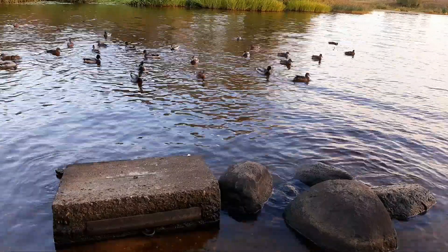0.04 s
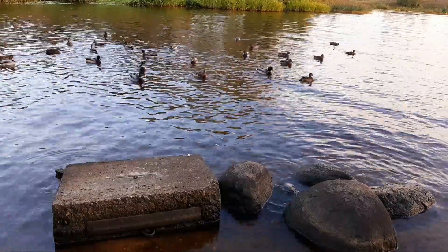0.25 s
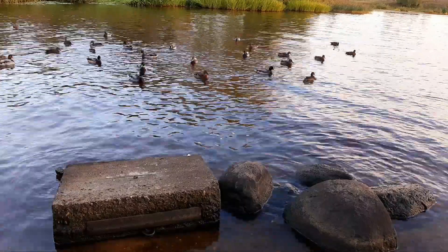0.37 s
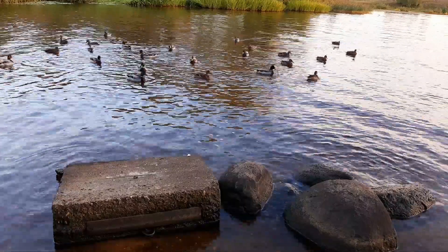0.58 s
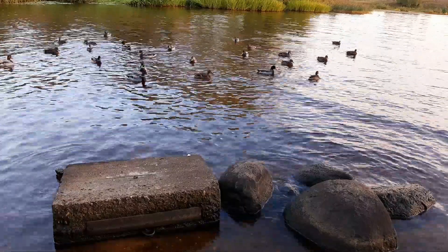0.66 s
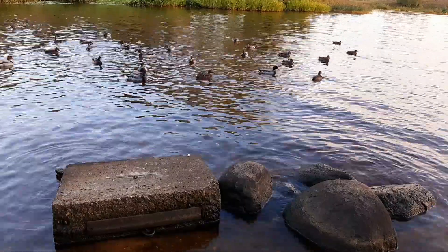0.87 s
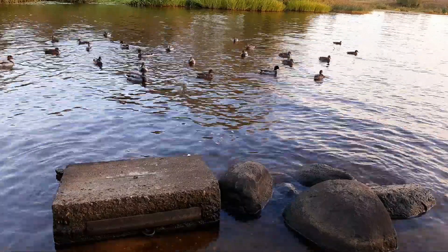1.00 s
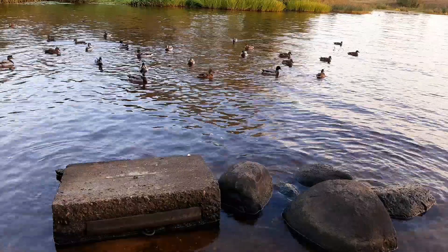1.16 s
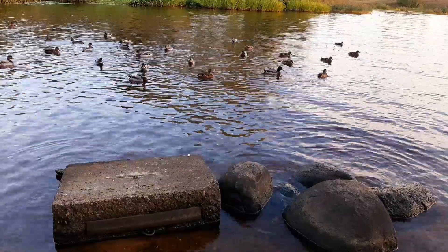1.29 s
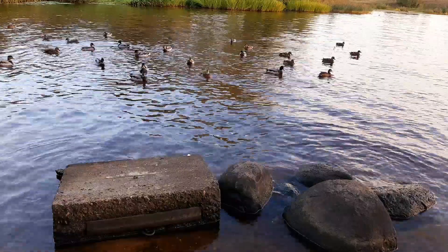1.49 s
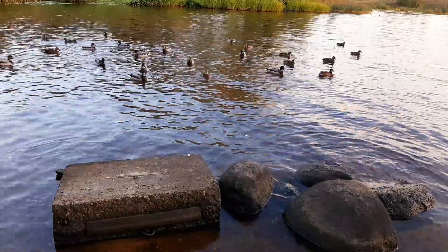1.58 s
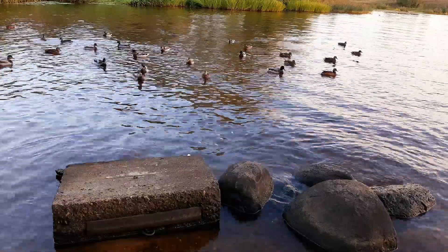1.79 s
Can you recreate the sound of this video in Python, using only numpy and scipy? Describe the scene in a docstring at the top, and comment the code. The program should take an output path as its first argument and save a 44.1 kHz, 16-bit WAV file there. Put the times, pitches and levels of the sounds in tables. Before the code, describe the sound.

Small ripples wash and lap at lakeshore stones while distant ducks quack and gulls yelp faintly

```python
"""A stony lake shore in a light breeze, with wind on the two ports of a microphone.
The wind is shaped noise at each port, pitched eddies and the hiss of one gust.
Close by, ripples wash and lap as noise and clouds of bubbles; droplets tick and trapped air plops.
Far out, gulls yelp in gliding harmonics and ducks quack as pulses through throat resonances;
the opposite bank answers both with a diffuse echo."""
import sys
import numpy as np
from scipy import signal
from scipy.fft import rfft, irfft, next_fast_len
from scipy.io import wavfile
from scipy.ndimage import uniform_filter1d, map_coordinates

SR = 44100
rng = np.random.default_rng(int(sys.argv[2]) if len(sys.argv) > 2 else 0)


def unload_audio(sound):
    """Save the sound as a 16-bit wav file, at the path given as the first command line argument."""
    columns = np.transpose(np.atleast_2d(sound))
    # keep every value between -1 and 1, then stretch to whole-number steps
    steps = np.round(np.clip(columns, -1, 1) * 32767)
    wavfile.write(sys.argv[1], SR, steps.astype(np.int16))


N = 81585
T = np.arange(N) / SR  # time in s

# Wind rumble at each port: t/s, level/dB
RUMBLE_LEVEL_LEFT = [(0, -46), (.12, -37.5), (.2, -46.5), (.55, -45), (.7, -39), (.9, -30), (1.05, -41),
                     (1.45, -44.5), (1.7, -45.5), (1.85, -45.5)]
RUMBLE_LEVEL_RIGHT = [(0, -46), (.1, -38.5), (.19, -39), (.24, -31.5), (.3, -32), (.45, -38.5), (.51, -29),
                      (.58, -27.5), (.65, -27.5), (.76, -38.5), (.85, -33.5), (1.03, -38.5), (1.1, -27),
                      (1.18, -40), (1.3, -33.5), (1.46, -31), (1.57, -41), (1.73, -48), (1.8, -42.5)]
# Spectrum of the rumble: f/Hz, density/dB
RUMBLE_SPECTRUM = [(20, -21), (40, -13), (62, 6), (100, 1.5), (150, 0), (210, -12.5), (290, -11.5),
                   (420, -30), (700, -49), (1500, -100)]
# Single eddies that strike a port: t/s (centre), level/dB, f/Hz, half length/s, roughness/0-1, port
EDDIES = [(0.015, -25.5, 85, 0.011, 0, "left"), (0.137, -26, 82.5, 0.0066, 0.07, "right"),
          (0.179, -24.5, 98, 0.01, 0.22, "right"), (0.235, -24, 123, .012, 0.63, "right"),
          (0.331, -27.5, 123, 0.0066, 0.58, "right"), (0.413, -19, 78.5, 0.0084, 0.46, "right"),
          (0.587, -17.5, 94.4, 0.014, 0.26, "right"), (0.63, -22, 115, 0.0084, 0.58, "right"),
          (0.657, -19, 112, 0.0058, 0.22, "right"), (0.847, -23.5, 109, 0.0081, 0.14, "left"),
          (.85, -29, 130, 0.01, 0.54, "right"), (0.887, -8, 101.7, 0.014, 0.06, "left"),
          (0.909, -14, 89, 0.0069, 0.2, "left"), (0.938, -23.5, 84, 0.015, 0.1, "left"),
          (1.088, -21.5, 119, 0.0075, 0.12, "right"), (1.122, -23, 97, 0.016, 0.06, "right"),
          (1.159, -26.5, 100, 0.011, 0, "left"), (1.29, -18.5, 96, 0.0077, 0.24, "right"),
          (1.36, -22, 88, 0.0046, 0, "right"), (1.409, -16.5, 151, 0.0038, 0.3, "right"),
          (1.432, -25, 127, 0.016, 0.09, "right"), (1.489, -23.5, 100, 0.011, 0, "right")]
# Spectrum of the roughness in an eddy: f/Hz, density/dB
EDDY_GRAIN_SPECTRUM = [(120, -7.5), (200, 3.5), (310, -2.5), (420, -12), (560, -28.5), (1200, -52.5)]
# Hiss of the gust at the right port: t/s, level/dB
GUST_LEVEL = [(0, -74), (.3, -58.5), (.47, -57.5), (.58, -50.5), (.62, -50.5), (.655, -45), (.71, -53.5),
              (.78, -51), (.88, -64.5), (1.03, -60.5), (1.25, -65), (1.45, -73), (1.85, -97)]
# Spectrum of the hiss: f/Hz, density/dB
HISS_SPECTRUM = [(1500, 1), (3000, -13), (4000, 7.5), (6000, -1), (9500, 1), (12500, 4.5), (16000, -1)]
EDDY_SPILL_DB = -26.5  # eddy at the other port
GUST_LEFT_DB = -6.5  # hiss at the left port, relative to the right

# Wash of the ripples: t/s, level/dB
WASH_LEVEL = [(0, -54.5), (.08, -53), (.25, -51.5), (.37, -54.5), (.55, -49), (.75, -51), (.92, -52),
              (1.04, -47), (1.17, -50.5), (1.36, -55.5), (1.54, -56), (1.62, -52), (1.76, -50),
              (1.85, -53.5)]
# Spectrum given to the wash and its fizz: f/Hz, weight/dB
WATER_SPECTRUM = [(200, 6), (400, 7), (750, -0.5), (1250, 1), (2000, 4), (2650, -0.5), (3300, -11),
                  (4200, -11), (6500, -11), (10000, -20.5), (16000, -20.5)]
BUBBLES_PER_S, BUBBLE_DECAY_CYCLES, BUBBLE_RISE = 420, 7, 0.0495  # rise: share of pitch per decay
FIZZ_DB, FLICKER_DB = -9, 1.5  # fizz against the wash; spread of the flicker

# Ripples that run up the stones: t/s, length/s, level/dB, lag of the right port/ms
LAPS = [(0.272, 0.11, -51.5, 0.22), (0.57, 0.3, -47, -0.35), (1.06, 0.44, -52, 0.44)]
# Spectrum given to the lapping froth: f/Hz, weight/dB
LAP_SPECTRUM = [(300, 13.5), (650, 3.5), (950, -0.5), (1300, 12), (2000, -2), (2700, -12), (3500, -12),
                (8000, -40)]

# Droplets that tick on stone and water: t/s, level/dB, f/Hz (ring), left over right/dB
DROPS = [(0.166, -42, 4200, 3), (.19, -44, 6700, 5), (0.2433, -41.5, 5800, 0), (0.8012, -31.5, 8000, -9),
         (0.8069, -28.5, 4300, -9), (0.9576, -37.5, 4300, 6), (1.025, -45.5, 11100, 5),
         (1.157, -39.5, 5040, 11), (1.228, -32, 5680, -3.5), (1.671, -43, 6500, 6), (1.7423, -43, 5060, 13)]
# Larger bubbles trapped by a lapping ripple: t/s, level/dB, f/Hz, decay/s, rise per decay/share
PLOPS = [(.186, -34.5, 740, 0.0051, 0.16), (.188, -28, 1300, 0.002, 0.12), (.334, -41, 1000, 0.0022, 0.086),
         (.922, -39, 682, 0.0099, 0.034), (.943, -38.5, 755, 0.0088, 0.03), (1.025, -40, 513, 0.0077, 0.06)]
DROP_RING_S, DROP_CRACK_S, DROP_CRACK = 0.00056, 0.00088, 1.37  # decays; crack gain against the ring
DROP_LOW_HZ = 4040  # high-pass of the droplets: thin, bright ticks with little below this

# Gull yelps: t/s, length/s, first f/Hz, last f/Hz, level/dB,
# brightness per harmonic up to the third/dB, lag of the right port/ms
YELPS = [(0.072, 0.036, 1135, 864, -54, -18, 0.14), (0.192, 0.058, 1355, 1180, -54.5, 0, -0.081),
         (0.383, 0.067, 1321, 955, -49.5, 3, -0.17), (0.451, 0.039, 1450, 1330, -58.5, 1.5, 0.14),
         (0.806, 0.05, 1380, 1296, -57, 6, 0.22), (0.981, 0.06, 1215, 1153, -51, -1, 0.37),
         (1.064, 0.041, 1280, 1116, -54, -3, 0.48), (1.094, 0.053, 1319, 968, -46.5, -2, -0.25),
         (1.133, 0.033, 1140, 990, -48.5, -0.5, -0.21), (1.223, 0.032, 1405, 1214, -57, -2, 0.42),
         (1.244, 0.041, 1057, 967, -52.5, -1, 0.27), (1.44, 0.048, 1138, 1052, -52.5, -3.5, 0.18),
         (1.553, 0.064, 1227, 1042, -48.5, 0.5, -0.15), (1.688, 0.094, 1122, 689, -50, -2, -0.19),
         (1.716, 0.035, 1450, 1287, -49.5, -1.5, 0.37)]
# Resonances of the gull's throat: f/Hz, level/dB
GULL_THROAT = [(800, -11), (1200, -6), (2350, 0), (3000, -14), (3800, -14), (4900, -25), (6200, -22),
               (8000, -48)]
GULL_ARCH = 1.45  # the pitch holds at first, then falls ever faster
GULL_JITTER, GULL_RASP_DB = 0.017, 3  # spread of the pitch (share) and of the level

# Duck quacks: t/s, length/s, f/Hz (pitch), f/Hz (throat), filter width/Hz, level/dB, lag of the right port/ms
QUACKS = [(0.028, 0.17, 304.6, 1350, 476, -50.5, 0.15), (0.164, 0.12, 302, 1350, 560, -52.5, -0.096),
          (0.783, 0.2, 279.5, 1520, 352, -51, 0.3), (1.001, .11, 356, 1680, 450, -54.5, 0.48),
          (1.415, 0.15, 291.8, 1670, 225, -50.5, 0.39), (1.547, 0.154, 305.3, 1725, 245, -48.5, 0.37),
          (1.685, 0.13, 290.8, 1670, 280, -49.5, 0.42), (1.713, 0.14, 269.7, 1650, 300, -48.5, 0.39)]
DUCK_SAG, DUCK_JITTER = 0.03, 0.028  # fall and spread of the pitch (shares)
DUCK_BREATH = 0.11  # noise gain against pulses of height 1
UPPER_RATIO, UPPER_DB = 1.514, -13.5  # upper resonance against the lower: pitch and level

BANK_T60_S, BANK_DB = 0.4, -11
SHADE_DB_PER_MS = 6  # the port that is reached later is also a little quieter
TOP_HZ = 15900


def undb(db):
    """Decibels to gain."""
    return 10 ** (np.asarray(db) / 20)


def unit(x):
    """Scale to rms 1."""
    return x / np.sqrt(np.mean(x ** 2) + 1e-20)


def even_out(x, size):
    """Hold the rms near 1 over a sliding window of this many samples."""
    return x / np.sqrt(uniform_filter1d(x ** 2, size=size))


def curve(rows):
    """Join the levels of a table by straight lines in time."""
    times, levels = np.array(rows).T
    return np.interp(T, times, levels)


def response(hz, points):
    """Gain of a spectrum table at these frequencies, joined on a log-frequency axis."""
    f, db = np.array(points).T
    return undb(np.interp(np.log(np.maximum(hz, 1)), np.log(f), db))


def colour(x, points):
    """Shape a signal with a spectrum table, at rms 1."""
    size = next_fast_len(N)
    gain = response(np.fft.rfftfreq(size, 1 / SR), points)
    return unit(irfft(rfft(x, size) * gain, size)[..., :N])


def band(x, hz, width_hz):
    """A two-pole resonance."""
    b, a = signal.iirpeak(min(hz, SR / 2 - 1), hz / width_hz, fs=SR)
    return signal.lfilter(b, a, x)


def walk(rate):
    """Smooth random drift with an rms of 1, given a new target at this rate in Hz."""
    k = max(int(SR / rate), 1)
    steps = np.repeat(rng.standard_normal(N // k + 2), k)
    return unit(uniform_filter1d(steps, k)[:N])


def pan(db):
    """Left and right gains for left over right in dB; the nearer side stays at 1."""
    return undb(np.minimum([[db], [-db]], 0))


def ports(x, lag_ms):
    """A sound from one side reaches the far port later and weaker."""
    right = map_coordinates(x, [np.arange(len(x)) - lag_ms * SR / 1000], order=3)
    return np.array([x, right]) * pan(SHADE_DB_PER_MS * lag_ms)


def add(out, start, x):
    """Mix a sound in at a time in s."""
    i = int(np.clip(start * SR, 0, N - 1))
    out[..., i:i + x.shape[-1]] += x[..., :N - i]


def bubble(hz, decay, rise):
    """A damped ring whose pitch climbs by the share 'rise' in each decay time."""
    t = np.arange(int(5 * decay * SR) + 2) / SR
    ring = np.sin(2 * np.pi * hz * t * (1 + rise * t / decay / 2))
    attack = 1 - np.exp(-2 * t * hz)
    return ring * np.exp(-t / decay) * attack


def wind():
    """Turbulence rumbles separately at each port, with single eddies and the hiss of the gust on top."""
    rumble = even_out(colour(rng.standard_normal((2, N)), RUMBLE_SPECTRUM), 2600)
    out = rumble * undb([curve(RUMBLE_LEVEL_LEFT), curve(RUMBLE_LEVEL_RIGHT)])
    grain = even_out(colour(rng.standard_normal(N), EDDY_GRAIN_SPECTRUM), 1200)
    for at, db, hz, half, rough, port in EDDIES:
        swirl = rough * grain + np.sin(2 * np.pi * hz * (T - at))
        swell = np.exp(-((T - at) / half) ** 2)
        side = pan(EDDY_SPILL_DB if port == "right" else -EDDY_SPILL_DB)
        out = out + side * undb(db) * swirl * swell
    hiss = colour(rng.standard_normal((2, N)), HISS_SPECTRUM)
    return out + hiss * undb(curve(GUST_LEVEL)) * pan(GUST_LEFT_DB)


def ripples():
    """A flickering noise wash with many tiny ringing bubbles scattered along the shore."""
    wash = rng.standard_normal((2, N)) * undb(FLICKER_DB * walk(25.25))
    fizz = np.zeros((2, N))
    for when, pitch, chance, side in rng.random((int(BUBBLES_PER_S * N / SR), 4)):
        hz = 450 * 26 ** pitch
        gain = hz * undb(-3 * np.log(chance + 0.03))  # few loud, many soft
        ring = bubble(hz, BUBBLE_DECAY_CYCLES / hz, BUBBLE_RISE) * gain
        add(fizz, when * N / SR, ring * pan(16 * (side - 0.5)))
    water = colour(wash, WATER_SPECTRUM) + undb(FIZZ_DB) * colour(fizz, WATER_SPECTRUM)
    return water * undb(curve(WASH_LEVEL))


def laps():
    """Each ripple swells and ebbs as a froth of short bubbles."""
    froth, out = np.zeros(N), np.zeros((2, N))
    for when, pitch, chance in rng.random((int(900 * N / SR), 3)):  # 900 bubbles per s
        hz = 400 * 12 ** pitch
        gain = hz * undb(-2.5 * np.log(chance + 0.0069))
        add(froth, when * N / SR, bubble(hz, 4 / hz, 0.057) * gain)
    froth = colour(froth, LAP_SPECTRUM)
    for at, length, db, lag_ms in LAPS:
        swell = np.sin(np.pi * np.clip((T - at) / length, 0, 1))
        out = out + undb(db) * ports(froth * swell, lag_ms)
    return out


def splashes():
    """Droplets crack and ring for an instant; trapped air plops as a ring of rising pitch."""
    out, t = np.zeros((2, N)), T[:SR // 100]
    thin = signal.butter(6, DROP_LOW_HZ, "high", fs=SR, output="sos")
    for at, db, hz, side_db in DROPS:
        burst = rng.standard_normal((2, len(t))) * np.exp(-t / DROP_CRACK_S)
        b, a = signal.butter(1, hz, fs=SR)
        crack = signal.lfilter(b, a, burst)
        ring = np.sin(2 * np.pi * hz * t) * np.exp(-t / DROP_RING_S)
        drop = signal.sosfilt(thin, ring + DROP_CRACK * crack)
        add(out, at, undb(db) * pan(side_db) * drop)
    for at, db, hz, decay, rise in PLOPS:
        add(out, at, undb(db) * ports(bubble(hz, decay, rise), lag_ms=0.37))
    return out


def gulls():
    """Short, slightly hoarse yelps: six harmonics arch down through the throat's resonances."""
    out = np.zeros((2, N))
    for at, length, first_hz, last_hz, db, bright_db, lag_ms in YELPS:
        u = np.linspace(0, 1, int(length * SR))
        glide = first_hz + (last_hz - first_hz) * u ** GULL_ARCH
        hz = glide * (1 + GULL_JITTER * walk(500)[:len(u)])
        phase = 2 * np.pi * np.cumsum(hz) / SR
        voice = 0
        for k in range(1, 7):
            gain = undb(min(k, 3) * bright_db) * response(k * hz, GULL_THROAT)
            voice = voice + gain * np.sin(k * phase)
        rasp = undb(GULL_RASP_DB * walk(282)[:len(u)])
        yelp = unit(voice * np.sin(np.pi * u) * rasp)
        add(out, at, undb(db) * ports(yelp, lag_ms))
    return out


def ducks():
    """Pulses and breath noise ring two throat resonances; the pitch sags in each quack."""
    out = np.zeros((2, N))
    for at, length, pitch_hz, throat_hz, width_hz, db, lag_ms in QUACKS:
        u = np.linspace(0, 1, int(length * SR))
        hz = pitch_hz * (1 - DUCK_SAG * u) * (1 + DUCK_JITTER * walk(150)[:len(u)])
        pulses = np.diff(np.floor(np.cumsum(hz) / SR), prepend=0)  # one per cycle
        source = pulses + DUCK_BREATH * rng.standard_normal(N)[:len(u)]
        upper_hz = throat_hz * UPPER_RATIO
        # each resonance is a narrow filter followed by one twice as wide
        lower = band(band(source, throat_hz, width_hz), throat_hz, 2 * width_hz)
        upper = band(band(source, upper_hz, width_hz), upper_hz, 2 * width_hz)
        swell = np.abs(np.sin(np.pi * u)) ** 0.5
        quack = unit((lower + undb(UPPER_DB) * upper) * swell)
        add(out, at, undb(db) * ports(quack, lag_ms))
    return out


def across_water(x):
    """The opposite bank adds a diffuse echo: decaying noise convolved with the far calls."""
    decay = np.exp(-np.log(1000) * T / BANK_T60_S)
    tail = unit(rng.standard_normal((2, N)) * decay) / np.sqrt(N)
    return x + undb(BANK_DB) * signal.fftconvolve(x, tail, axes=1)[:, :N]


def scene():
    """Wind on the microphone, water close by, birds far off."""
    return wind() + ripples() + laps() + splashes() + across_water(gulls() + ducks())


def record(dry):
    """A steep low-pass cuts the top of the treble."""
    low_pass = signal.ellip(10, 0.2, 80, TOP_HZ, fs=SR, output="sos")
    return signal.sosfilt(low_pass, dry)


dry = scene()
out = record(dry)
unload_audio(out)
```